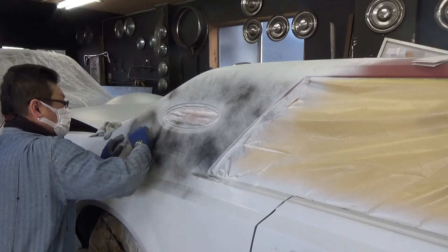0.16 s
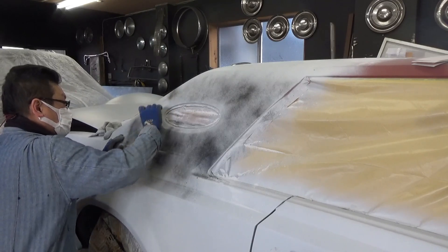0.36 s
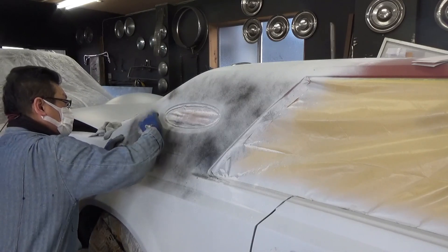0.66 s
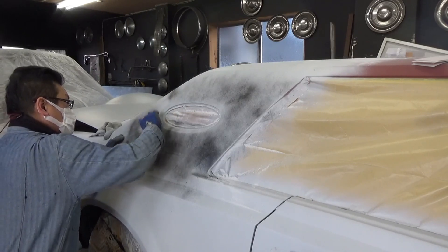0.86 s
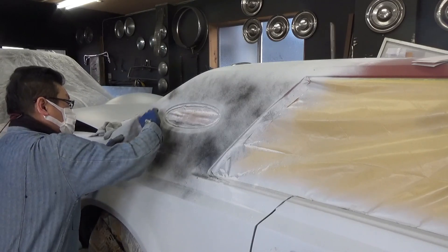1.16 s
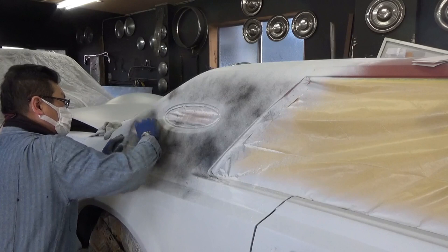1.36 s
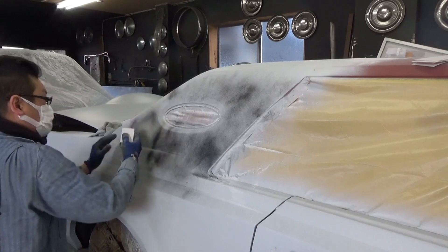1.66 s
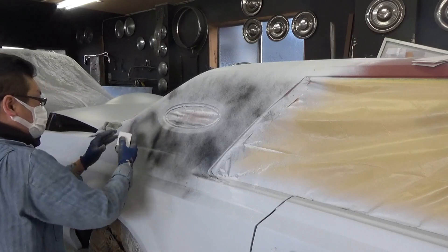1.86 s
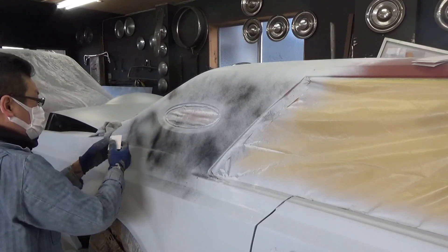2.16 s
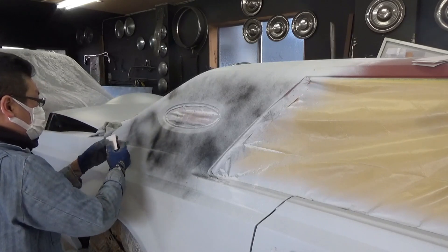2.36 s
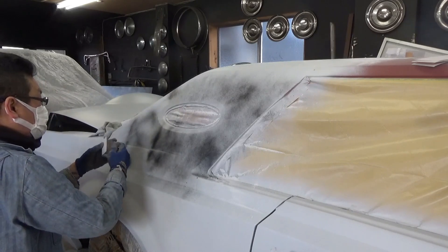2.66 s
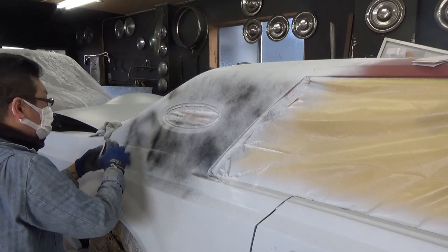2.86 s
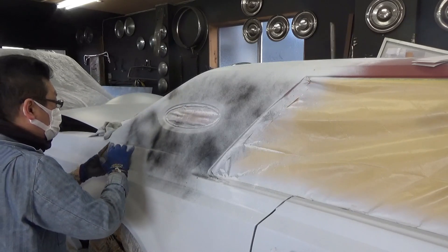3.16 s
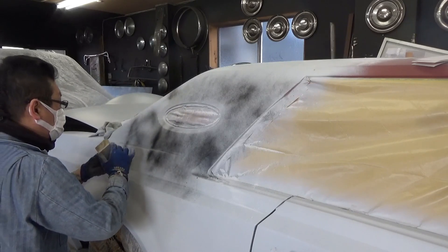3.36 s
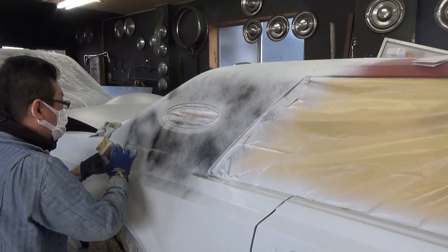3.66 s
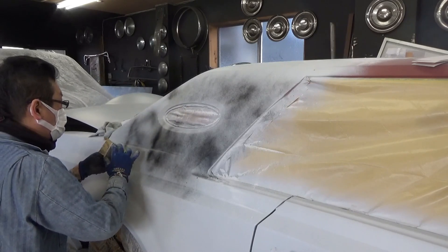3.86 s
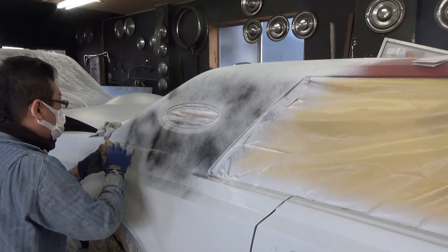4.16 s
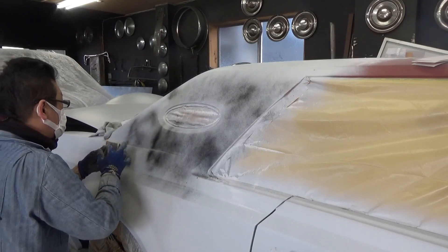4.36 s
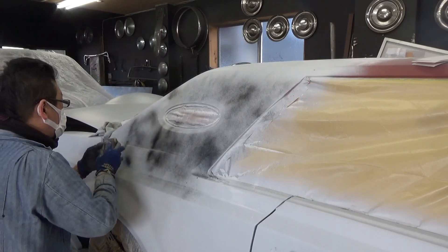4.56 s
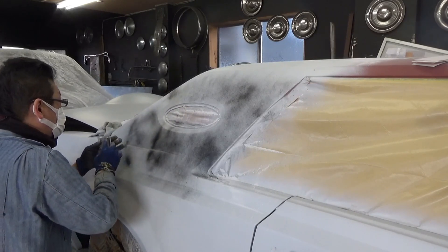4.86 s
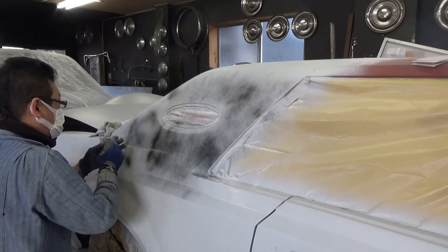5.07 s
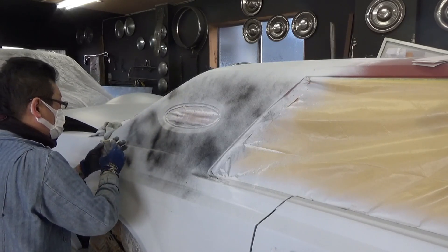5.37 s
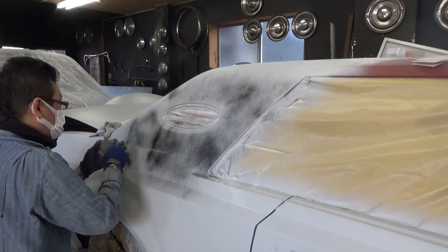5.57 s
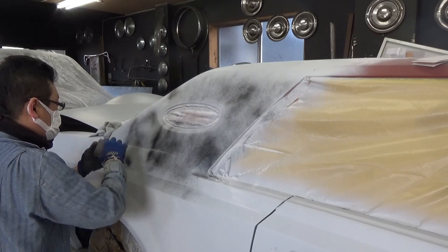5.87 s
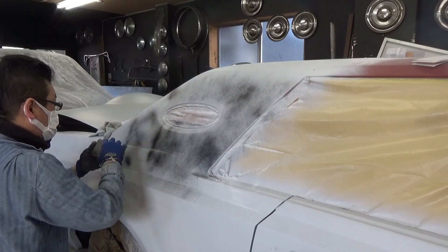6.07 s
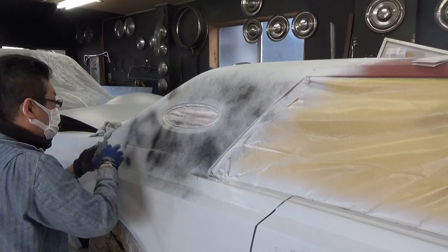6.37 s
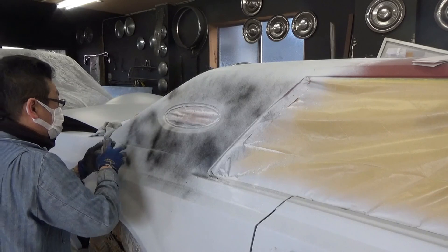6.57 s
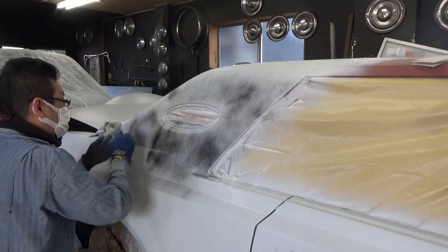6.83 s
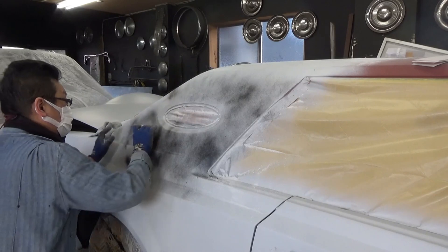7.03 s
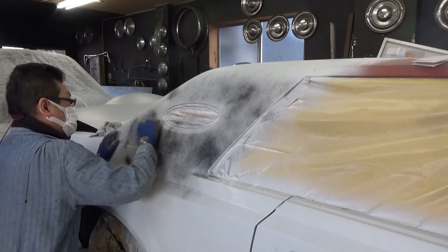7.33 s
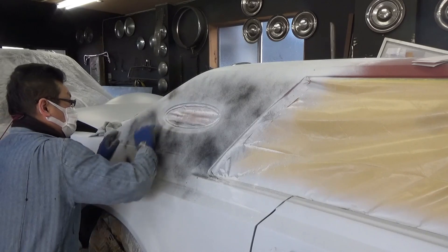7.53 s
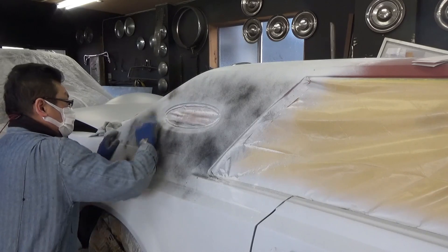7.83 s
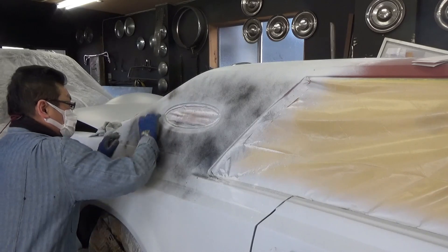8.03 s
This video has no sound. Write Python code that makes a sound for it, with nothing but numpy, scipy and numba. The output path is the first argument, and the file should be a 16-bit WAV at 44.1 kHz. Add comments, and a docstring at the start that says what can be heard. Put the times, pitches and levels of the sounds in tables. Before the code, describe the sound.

Hand sanding on a primed car panel stops for quiet sandpaper crackling, then resumes, while a motor hums in the garage.

```python
"""A sanding block rasps back and forth over a primed car panel in a garage, its grit cutting the primer.
Between two bursts of strokes the gloves shift on the block: light rubs and small snaps of the paper.
Somewhere in the building a motor hums, slowly changing speed, and a second tone makes it throb.
Under it all lie a low rumble and a soft rush of air."""
import sys
import numpy as np
from scipy import signal
from scipy.fft import rfft, irfft, next_fast_len
from scipy.io import wavfile
from scipy.ndimage import uniform_filter1d, map_coordinates
from numba import njit

SR = 44100
rng = np.random.default_rng(int(sys.argv[2]) if len(sys.argv) > 2 else 0)


def to_wav(s):
    """Save 16-bit WAV."""
    ch = np.atleast_2d(s).T  # columns
    pcm = np.round(np.clip(ch, -1, 1) * 32767)  # PCM
    wavfile.write(sys.argv[1], SR, pcm.astype(np.int16))


N = 361619
T = np.arange(N) / SR

# Strokes of the block, with relative levels for the whole stroke and its low and sharpest parts:
# t at top speed/s, speeding up/s, slowing down/s, level/dB, body/dB, grit/dB
STROKES = [(-0.021, 0.027, 0.098, -16.5, -1, 1), (0.187, 0.12, 0.065, -19, -1, 3),
           (0.751, 0.1, 0.099, -19.5, 1.5, -3), (0.943, 0.1, 0.083, -20.5, -0.5, -2.3),
           (1.064, 0.044, 0.14, -17.5, -3.5, -4.5), (1.262, 0.084, 0.11, -18, -3, -4.5),
           (7.396, 0.085, 0.11, -22, 4.5, 3), (7.602, 0.11, 0.043, -19.5, 1, 3),
           (7.685, 0.04, 0.15, -21.5, 2.5, 4), (7.905, 0.092, 0.067, -21.5, 1, 3),
           (8.051, 0.094, 0.12, -22.5, 4, 4), (8.239, 0.094, 0.061, -23, 7.5, 7)]
# Tone colour of grit cutting primer: f/Hz, level/dB
GRIT_COLOUR = [(300, -20.5), (700, -15), (1100, -10), (1700, -11.5), (2250, -8.5), (3400, -9), (4500, -5),
               (6200, -3.5), (8200, -3.5), (9500, -2), (11000, -6)]
def sanding(gap_hz=6340, wander_hz=170):
    """Thousands of sharp grains cut the primer at once; the block judders a little as it slides."""
    cutting = colour(grains(rate=22000, spread_db=0.5), GRIT_COLOUR)
    # The gap between block and panel colours the hiss, and wanders as the block travels.
    gap = resonate(cutting, gap_hz + wander_hz * walk(4), width_hz=1040.0)
    judder = undb(0.61 * walk(110))
    texture = unit(cutting + undb(-1.5) * gap) * judder
    body = below(texture, hz=3600)
    strokes = friction(STROKES, body, texture - body, grit_hz=7000,
                       body_power=0.6, hiss_power=1.22, grit_power=1.68)
    return undb(2.0) * strokes


def friction(moves, body, hiss, grit_hz, body_power, hiss_power, grit_power):
    """Each rub speeds up, then slows; a part with a higher power needs more speed to be heard."""
    soft_hiss = below(hiss, grit_hz, order=4)
    grit = hiss - soft_hiss
    out = np.zeros(N)
    for fastest, rise, fall, db, body_db, grit_db in moves:
        now = (T > fastest - rise) & (T < fastest + fall)
        speed = np.cos(np.interp(T[now] - fastest, [-rise, 0, fall], [-np.pi / 2, 0, np.pi / 2]))
        out[now] += undb(db) * (undb(body_db) * speed ** body_power * body[now]
                                + speed ** hiss_power * soft_hiss[now]
                                + undb(grit_db) * speed ** grit_power * grit[now])
    return out


# Light rubs of glove and paper, with relative levels:
# t at top speed/s, speeding up/s, slowing down/s, level/dB, body/dB, grit/dB
RUBS = [(0.596, 0.012, 0.032, -45, 3, 0), (2.118, 0.024, 0.03, -33, 2.5, -3),
        (2.253, 0.056, 0.051, -40.5, -1.5, 1.5), (2.605, 0.18, 0.029, -42.5, 8, 1),
        (2.79, 0.18, 0.084, -50.5, 5.5, -1), (2.935, 0.04, 0.051, -44.5, 2, -3),
        (3.069, 0.084, 0.18, -45.5, -1, 5), (3.266, 0.052, 0.15, -43.5, 2.5, 7),
        (3.46, 0.12, 0.064, -45, 3, 1.5), (3.727, 0.033, 0.018, -47, 2, 7),
        (3.9, 0.13, 0.13, -43.5, 5, 1.5), (4.192, 0.055, 0.21, -41, 2, 1.5),
        (4.587, 0.024, 0.06, -43, -6, 0), (4.667, 0.02, 0.022, -29, 1.5, -2),
        (4.805, 0.041, 0.11, -34, -2, -2), (5.4, 0.08, 0.018, -55, -2, 2),
        (5.549, 0.011, 0.12, -40.5, 8, 7), (5.9, 0.067, 0.091, -51, 8.5, 4),
        (6.319, 0.098, 0.074, -47.5, 1, 2), (6.418, 0.058, 0.037, -42.5, -4, 7),
        (6.645, 0.04, 0.04, -39, 2, 1), (6.853, 0.05, 0.038, -32, 4.5, 3),
        (7.136, 0.032, 0.054, -40.5, 0, 8)]
# Tone colour of a sliding glove: f/Hz, level/dB
GLOVE_COLOUR = [(500, -22), (1200, 3), (2000, 2), (2900, -2), (3700, -0.5), (4800, -3), (6100, 1),
                (7200, -4.5), (9000, -6), (11000, -12.5)]
def gloves(crinkle_db=-2, hold_from_s=2.29, hold_to_s=8.3):
    """Gloves and paper slide, catch and crinkle, which sounds the hollow under the hand."""
    catches = grains(rate=7000, spread_db=1)
    crinkles = undb(crinkle_db) * grains(rate=170, spread_db=0.5)
    texture = unit(colour(catches + crinkles, GLOVE_COLOUR)) * undb(2.6 * walk(60))
    body = undb(-3.0) * hollow(texture, ring_width_hz=100, ring_db=-14)
    hiss = texture - below(texture, hz=3050)
    rubs = friction(RUBS, body, hiss, grit_hz=7500, body_power=1.8, hiss_power=1.48, grit_power=1.5)
    # The fingers never rest while they hold the block, so a faint rustle goes on between rubs.
    holding = uniform_filter1d(1. * ((T > hold_from_s) & (T < hold_to_s)), size=4000)
    rustle = holding * undb(-57.5 + 2 * walk(11)) * (body + hiss)
    return undb(0.35) * rubs + rustle


# Snaps of paper and block under the fingers, with relative levels: t/s, level/dB, length/s, knock/dB
SNAPS = [(0.363, -31, .004, -12), (1.524, -23, 0.0035, -1), (2.613, -22, 0.0079, 8),
         (3.498, -23, 0.0046, 8), (3.925, -23.5, .007, -4), (4.373, -14.5, 0.0028, -15),
         (4.411, -18, 0.0099, -25), (4.525, -6, 0.0028, 1.5), (4.664, -22, 0.0073, -7),
         (4.805, -13, 0.0025, -27), (5.103, -22.5, 0.0063, -1.5), (5.204, -14, 0.0077, -18),
         (5.63, -17, 0.0066, -25), (6.438, -9, 0.0044, -2), (6.575, -20.5, 0.008, -35),
         (6.801, -24, .005, -3), (6.847, -18.5, 0.0056, 2.5), (7.125, -16.5, .003, -16),
         (7.137, -17, 0.0048, -16)]
# Tone colour of cracking sandpaper: f/Hz, level/dB
PAPER_COLOUR = [(700, -19), (1500, -3.5), (3000, -8), (4800, -5), (6300, 2), (8000, -2), (11000, -9)]
def snaps(crack_db=-6, knock_db=-4, rise_s=0.00039):
    """A snap is a quick cluster of tiny slips: it cracks in the paper and knocks in the hollow."""
    slips = rng.standard_normal(N)
    crack, push = np.zeros(N), np.zeros(N)
    for start, db, length, push_db in SNAPS:
        now = (T >= start) & (T < start + 10 * length)
        age = T[now] - start
        shape = (1 - np.exp(-age / rise_s)) * np.exp(-(age / length) ** 2 / 2)
        burst = undb(db) * slips[now] * shape
        crack[now] += burst
        push[now] += burst * undb(push_db)
    knock = hollow(push, ring_width_hz=130, ring_db=0)
    return undb(crack_db) * colour(crack, PAPER_COLOUR) + undb(knock_db) * knock


# The note of the hollow, which follows the grip: t/s, f/Hz
HOLLOW_NOTE = [(1.53, 1750), (2.25, 2380), (2.57, 2280), (2.62, 1800), (3.5, 2680), (3.86, 2810),
               (4.53, 2349), (5.1, 2740), (5.9, 2550), (6.44, 1780), (6.7, 2750)]
def hollow(x, ring_width_hz, ring_db, broad_width_hz=1500):
    """The hollow between hand, block and panel favours a broad band, with a narrow ring on top."""
    hz, = curves(HOLLOW_NOTE)
    broad = resonate(x, hz, 1. * broad_width_hz)
    broad = resonate(broad, hz, 2. * broad_width_hz)
    return broad + undb(ring_db) * resonate(broad, hz, 1. * ring_width_hz)


# Notes of the steel panel (narrower ones ring longer): f/Hz, width/Hz, level/dB
PANEL_NOTES = [(2810, 16, -3), (2900, 4.5, -0.5), (3060, 8, -3.5)]
def panel(x):
    """Whatever rubs or knocks on the sheet steel leaves it ringing faintly."""
    return x + sum(undb(db) * resonate(x, np.full(N, 1. * hz), 1. * width_hz)
                   for hz, width_hz, db in PANEL_NOTES)


def garage(x, early_s=0.0077, tail_s=0.45, treble_s=0.21, echo_db=-10):
    """The car body echoes at once; the cluttered room adds a short tail whose treble dies first."""
    t = T[:int(.7 * SR)]
    early = rng.standard_normal((2, len(t))) * (t > .001) * np.exp(-t / early_s)
    noise = rng.standard_normal((2, len(t))) * (t > .005)
    dull = below(noise, hz=7040)
    fade = -np.log(1000) * t  # 60 dB down after tail_s or treble_s
    tail = dull * np.exp(fade / tail_s) + (noise - dull) * np.exp(fade / treble_s)
    early = undb(echo_db) * early / np.linalg.norm(early[0])
    tail = undb(echo_db) * tail / np.linalg.norm(tail[0])
    mid = (t == 0) + early[0] + tail[0]  # what both ears share
    side = 0.69 * early[1] + 0.2 * tail[1]  # what sets them apart
    response = (mid + side * np.array([[1], [-1]])) / np.linalg.norm(mid)
    return signal.fftconvolve(x[None], response, axes=1)[:, :N]


# Pitch of the hum as the motor slows and speeds up: t/s, f/Hz
HUM_PITCH = [(0, 159.8), (0.95, 153.7), (1.85, 156.3), (2.8, 162.4), (4.1, 181.6), (4.85, 187.5),
             (5.7, 178.4), (7.15, 165.2), (8.2, 172.4)]
# The hum swells and fades: t/s, level/dB
HUM_LEVEL = [(0, -40.5), (0.95, -33), (1.05, -40), (1.26, -30), (1.85, -23), (2.56, -21.5), (2.66, -37.5),
             (2.8, -24), (3.75, -24), (3.95, -32.5), (4.1, -23), (4.85, -24), (5.1, -37.5), (6.2, -30),
             (6.35, -51.5), (7.2, -28), (7.32, -37), (7.42, -18.5), (7.8, -18.5), (8.2, -22)]
# The second tone, just under the hum: t/s, f below the hum/Hz, level/dB
THROB = [(2.6, 13.3, -45), (3.15, 16, -30.5), (4.25, 17.7, -34), (5.4, 12.3, -40), (7.35, 12.15, -43),
         (7.8, 13.7, -22), (8.2, 13.2, -33)]
# Higher tones of the hum: t/s, level at 1.5 times the pitch/dB, level at twice the pitch/dB
HUM_OVERTONES = [(0, -66, -60), (4.7, -62, -52.5), (5, -41, -50), (5.4, -51, -67.5), (6.6, -44, -41),
                 (7.55, -44, -51.5), (7.95, -45, -33)]
def motor(waver_hz=0.26, flutter_db=1.5, ripple_peak_hz=166.8, repeat_hz=11.6):
    """A motor hums with weak overtones; a second tone drifts in and out of step, making it throb."""
    hz, = curves(HUM_PITCH)
    db, = curves(HUM_LEVEL)
    beat_hz, beat_db = curves(THROB)
    fifth_db, octave_db = curves(HUM_OVERTONES)
    phase = 2 * np.pi * np.cumsum(hz + waver_hz * walk(9)) / SR
    lag = 2 * np.pi * np.cumsum(beat_hz) / SR
    hum = undb(db + flutter_db * walk(14)) * np.sin(phase)
    second_tone = undb(beat_db + walk(8.8)) * np.sin(phase - lag)
    fifth = undb(fifth_db + 2 * walk(13)) * np.sin(3 * phase / 2)
    octave = undb(octave_db + 2 * walk(8)) * np.sin(2 * phase)
    # Standing waves (loud and quiet spots in the room) shift the hum sideways as its pitch moves.
    offset_hz = hz - ripple_peak_hz
    ripple_db = 1.05 * np.cos(2 * np.pi * offset_hz / repeat_hz)
    left_db = 2.5 - 0.0748 * offset_hz + ripple_db
    return pan(np.sqrt(2) * (hum + second_tone + fifth + octave), left_db)


# Tone colour of the room's background noise: f/Hz, level/dB
ROOM_COLOUR = [(20, -51), (32, -20), (42, 5), (55, -2), (75, 7), (100, 0.5), (130, 2.5), (220, -2),
               (290, 0.5), (400, -6.5), (530, -3.5), (750, -8), (1100, -12), (1700, -17), (2500, -24),
               (3600, -30.5), (6300, -31), (11000, -36.5)]
# The soft rush of air in the room: t/s, level/dB
AIR_RUSH = [(0, -35), (1.8, -37.5), (2.7, -33.5), (3.5, -37.5), (4.6, -35.5), (5.35, -38.5), (7.6, -33),
            (8.2, -34.5)]
def rumble(deep_db=-45, growth_db_per_s=0.75):
    """The building's deep rumble grows slowly, under a swelling rush of air and a faint steady hiss."""
    mid, side = unit(colour(rng.standard_normal((2, N)), ROOM_COLOUR))
    air = mid + undb(-13) * side * np.array([[1], [-1]])
    deep, low = below(air, hz=138, order=4), below(air, hz=1800)
    rush_db, = curves(AIR_RUSH)
    building = undb(deep_db + growth_db_per_s * T) * unit(deep)
    rush = undb(rush_db + walk(7.6)) * unit(low - deep)
    hiss = undb(-37) * (air - low)
    return pan(building + rush + hiss, left_db=1.5)


def undb(db):
    """Turn decibels into a number to multiply by."""
    return 10 ** (np.asarray(db) / 20)


def curves(table):
    """Join a table's timed points with straight lines, one signal for each column after the time."""
    times, *columns = np.transpose(table)
    return [np.interp(T, times, column) for column in columns]


def unit(x):
    """Scale a signal to an average strength (rms) of 1."""
    return x / np.sqrt(np.mean(x ** 2))


def colour(x, points):
    """Shape a sound's tone through (f/Hz, level/dB) points; it falls away below the first."""
    hz, db = np.transpose(points)
    size = next_fast_len(N + 4096)
    f = np.arange(size // 2 + 1) * SR / size + 1e-3
    gain = undb(np.interp(np.log(f), np.log(hz), db)) * np.minimum(f / hz[0], 1) ** 2
    return irfft(rfft(x, size) * gain, size)[..., :N]


def walk(rate):
    """A smooth random wobble of size about 1, changing about rate times a second."""
    knots = rng.standard_normal(4096)
    return unit(map_coordinates(knots, [T * rate], order=2, mode="wrap"))


def pan(x, left_db):
    """Make the left channel left_db louder than the right."""
    return x * undb(left_db * np.array([[1], [-1]]) / 2)


def grains(rate, spread_db):
    """Tiny random hits of unequal size, about rate of them a second."""
    hit = rng.random(N) < rate / SR
    return unit(hit * rng.uniform(-1.02, 1, N) * undb(spread_db * rng.standard_normal(N)))


@njit
def resonate(x, hz, width_hz):
    """Keep a band of sound around a pitch that may move (a state-variable filter)."""
    out, band, low = np.empty(len(x)), 0., 0.
    for i in range(len(x)):
        tuning, damping = np.tan(np.pi * hz[i] / SR), width_hz / hz[i]
        swing = (band + tuning * (x[i] + 1e-18 - low)) / (1 + tuning * (tuning + damping))
        band = 2 * swing - band
        low += 2 * tuning * swing
        out[i] = damping * swing
    return out


def below(x, hz, order=2):
    """The part of a sound under hz, with no delay."""
    return signal.sosfiltfilt(signal.butter(order, hz, fs=SR, output="sos"), x)


def scene():
    """The hand work sounds near the centre, hum and rumble a little to the left."""
    work = garage(panel(sanding() + gloves() + snaps()))
    return pan(work, left_db=.5) + motor() + rumble()


def record(dry):
    """The highest treble, above 11050 Hz, is cut off steeply."""
    return signal.sosfilt(signal.ellip(12, .1, 80, 11050, fs=SR, output="sos"), dry)


dry = scene()
out = record(dry)
to_wav(out)
```